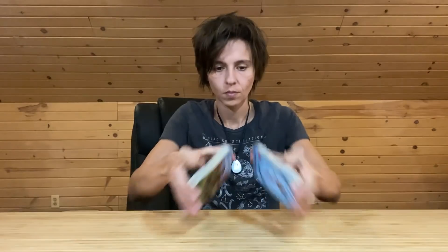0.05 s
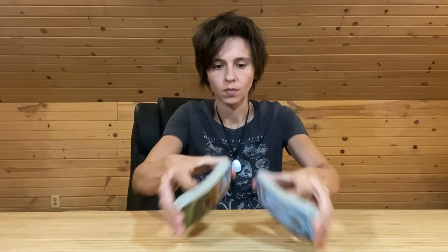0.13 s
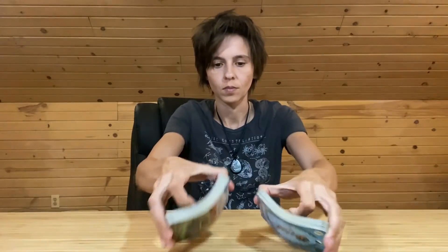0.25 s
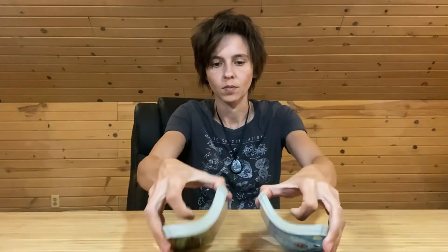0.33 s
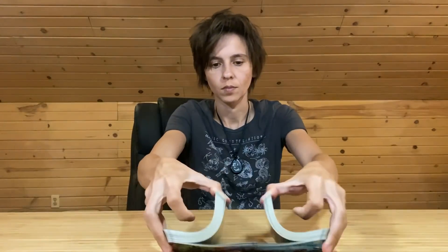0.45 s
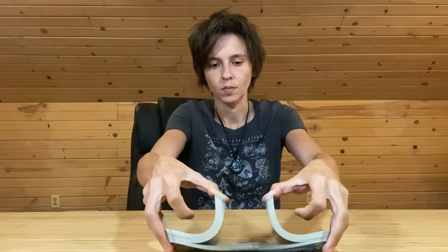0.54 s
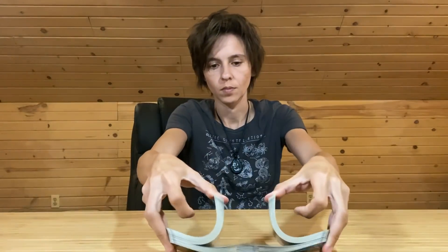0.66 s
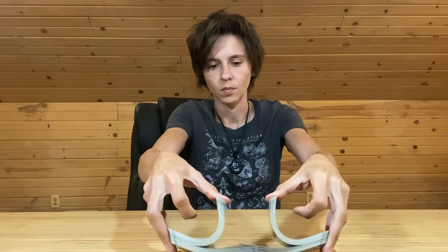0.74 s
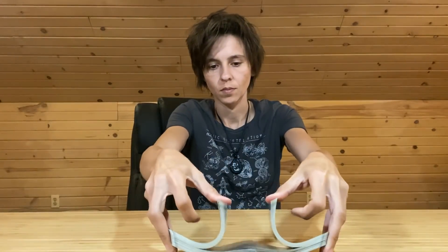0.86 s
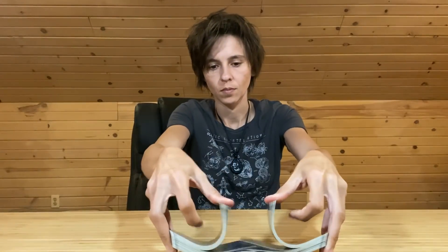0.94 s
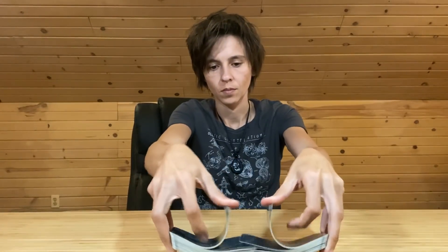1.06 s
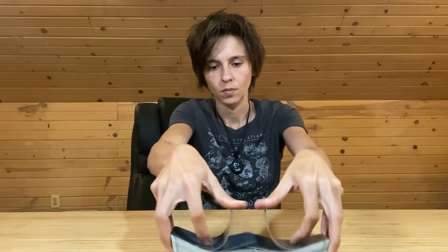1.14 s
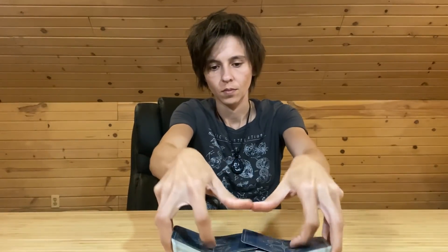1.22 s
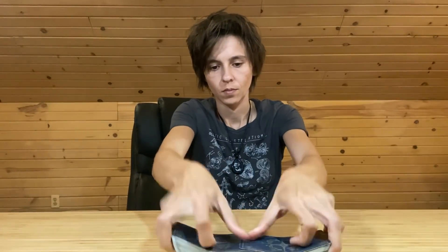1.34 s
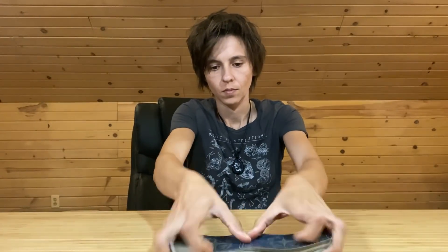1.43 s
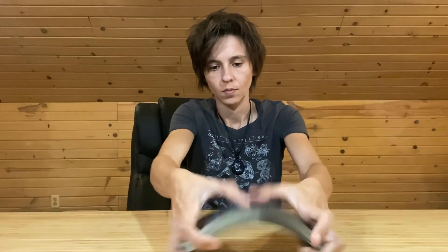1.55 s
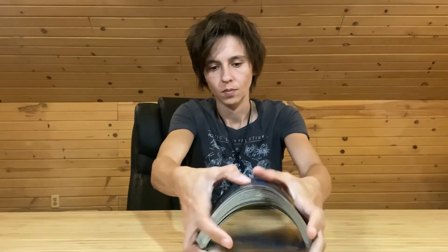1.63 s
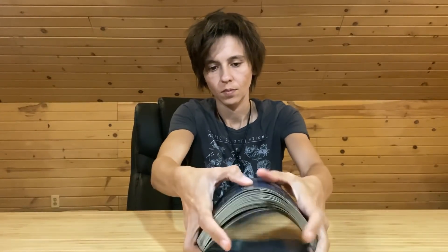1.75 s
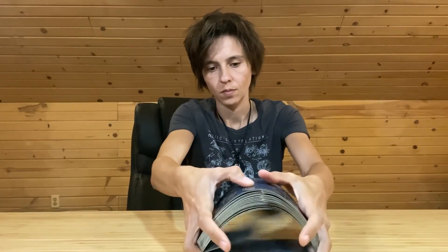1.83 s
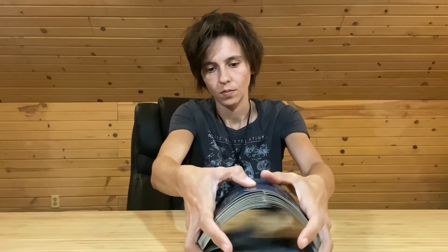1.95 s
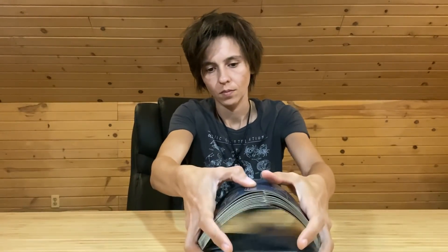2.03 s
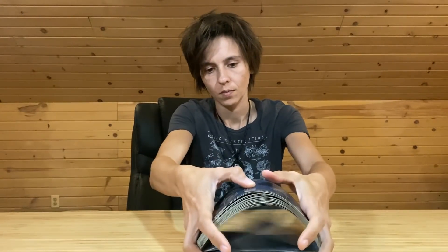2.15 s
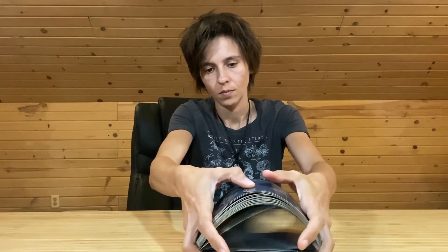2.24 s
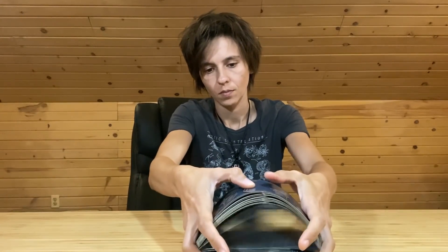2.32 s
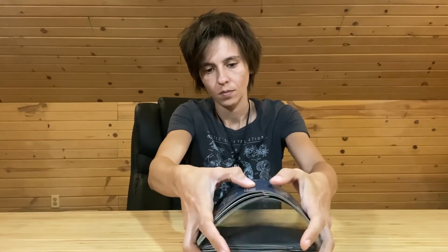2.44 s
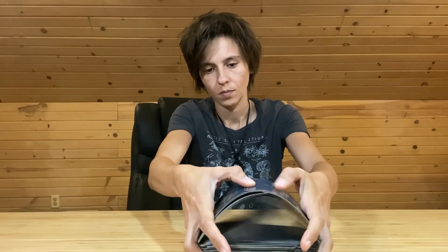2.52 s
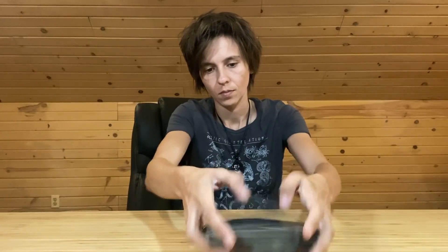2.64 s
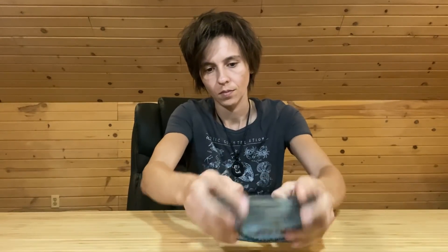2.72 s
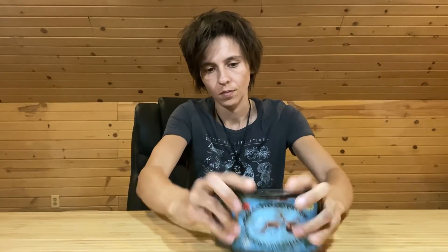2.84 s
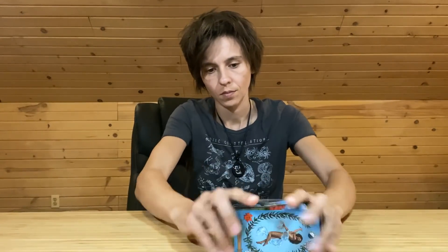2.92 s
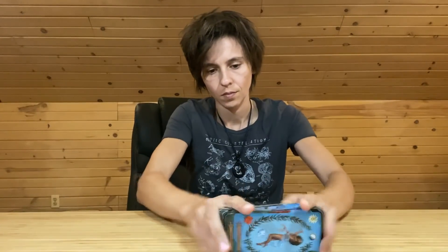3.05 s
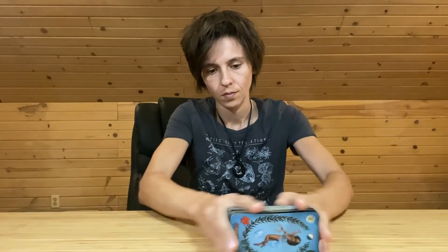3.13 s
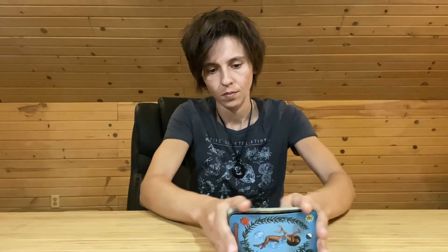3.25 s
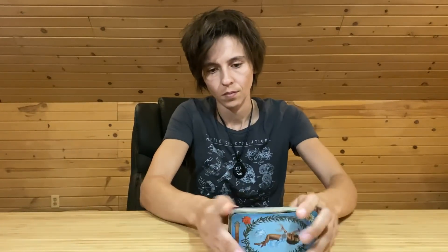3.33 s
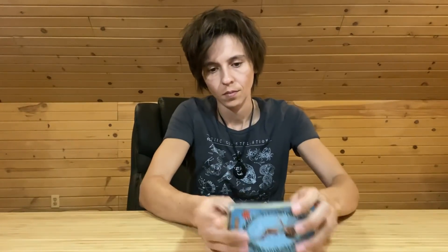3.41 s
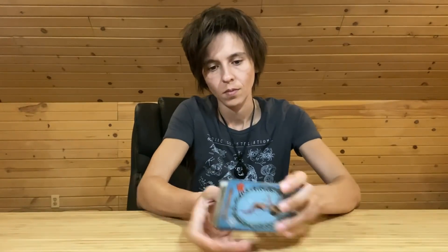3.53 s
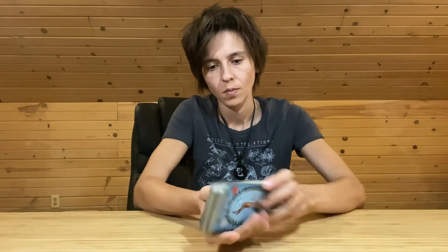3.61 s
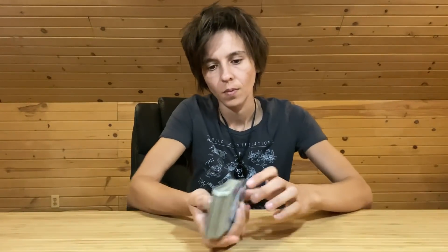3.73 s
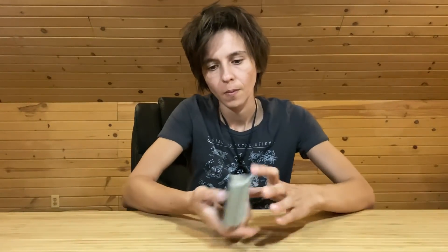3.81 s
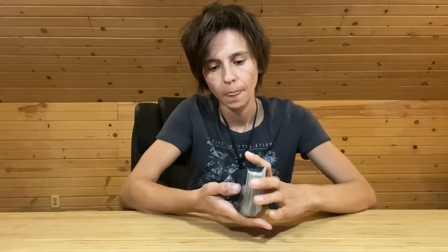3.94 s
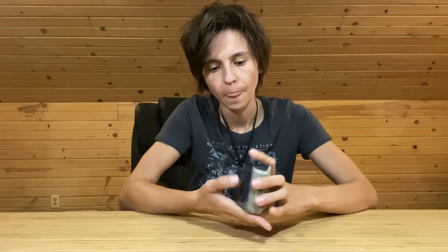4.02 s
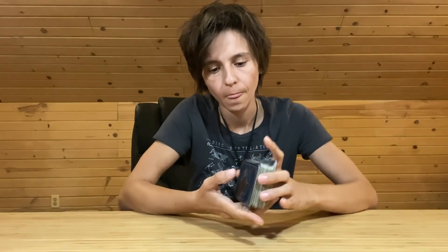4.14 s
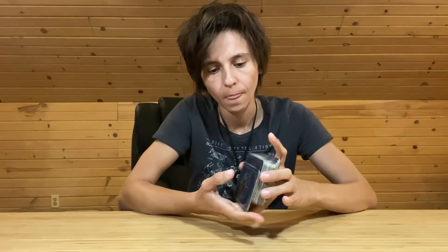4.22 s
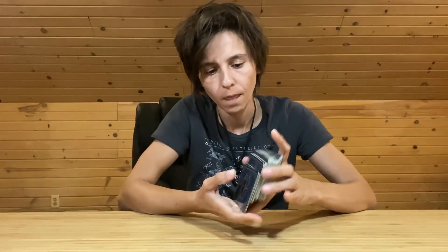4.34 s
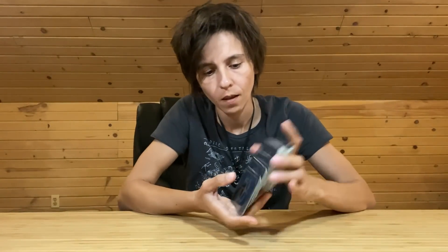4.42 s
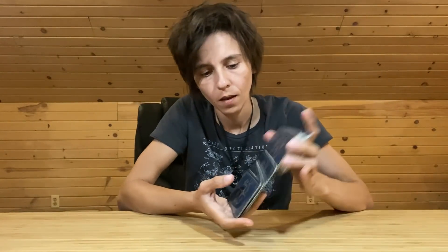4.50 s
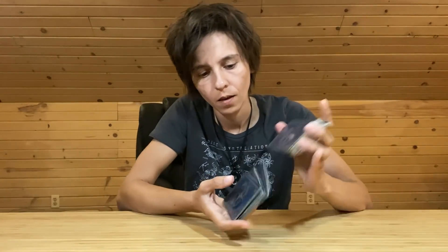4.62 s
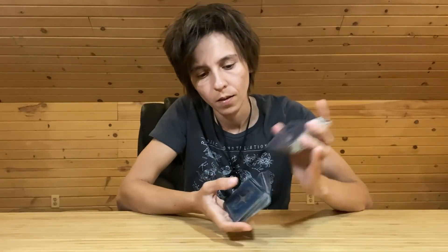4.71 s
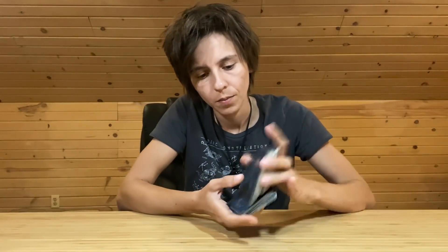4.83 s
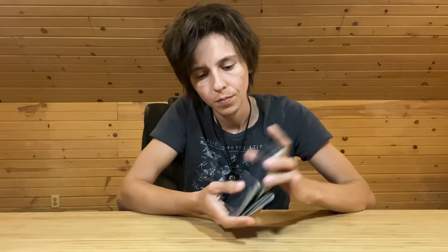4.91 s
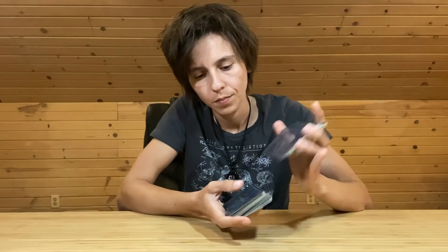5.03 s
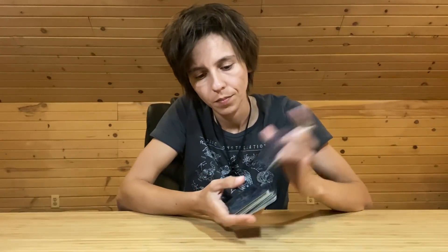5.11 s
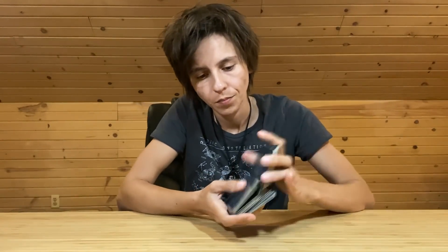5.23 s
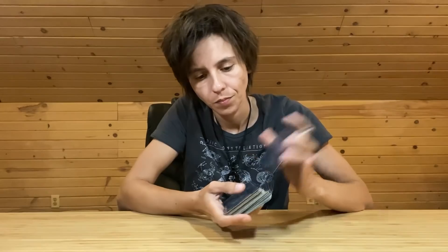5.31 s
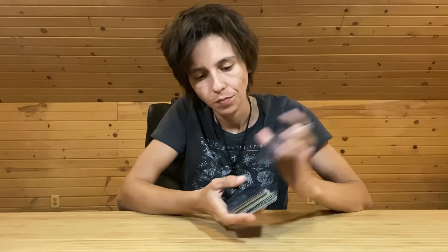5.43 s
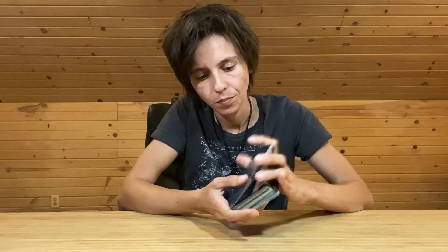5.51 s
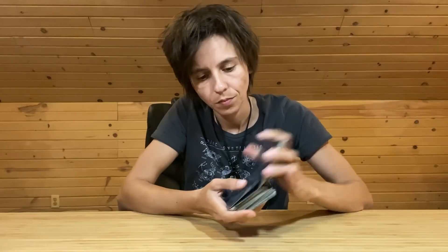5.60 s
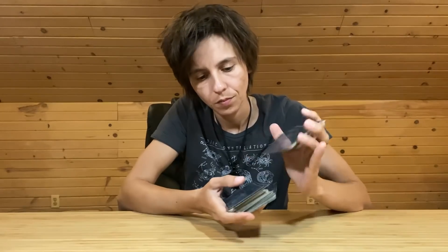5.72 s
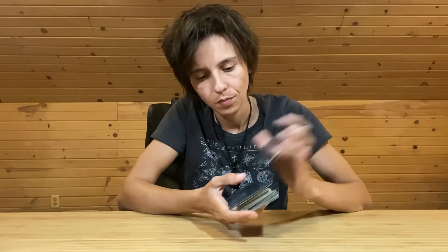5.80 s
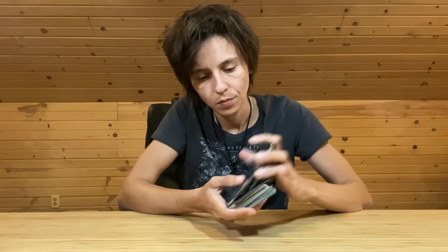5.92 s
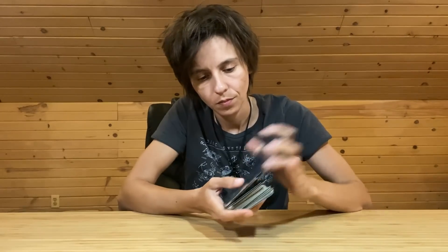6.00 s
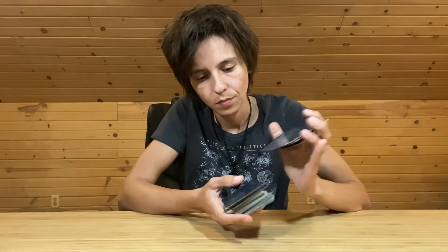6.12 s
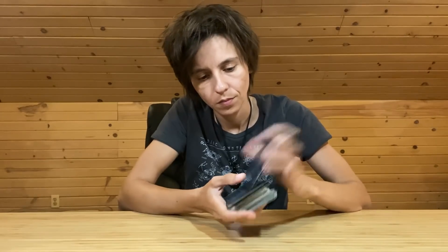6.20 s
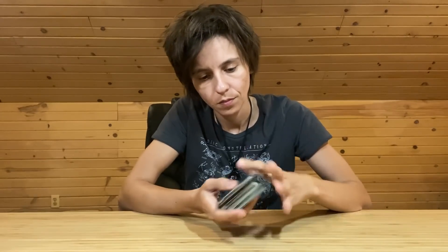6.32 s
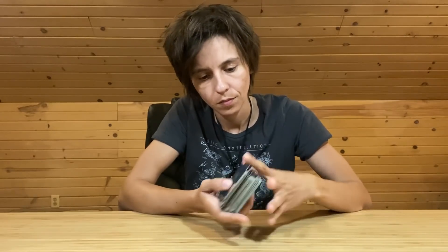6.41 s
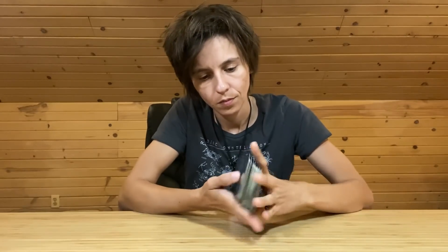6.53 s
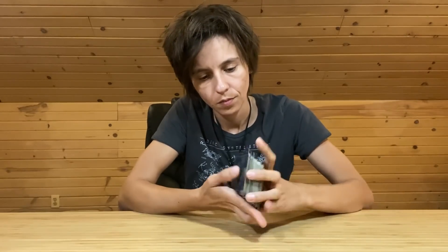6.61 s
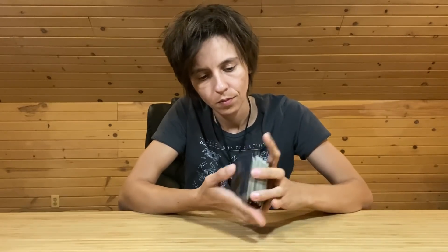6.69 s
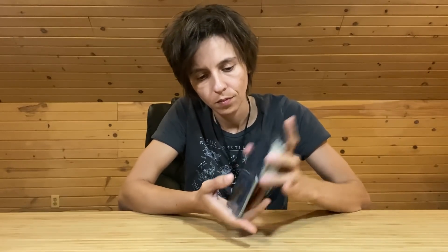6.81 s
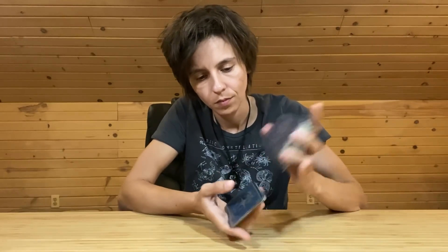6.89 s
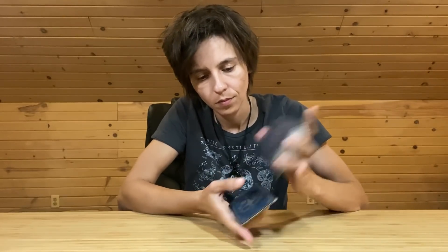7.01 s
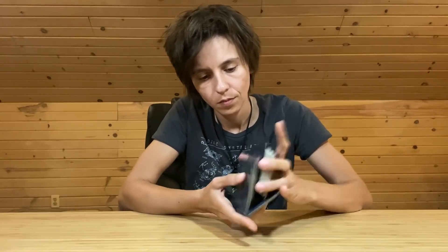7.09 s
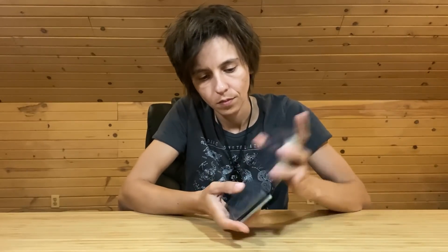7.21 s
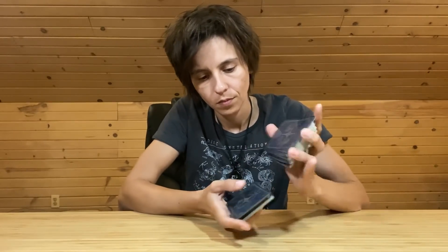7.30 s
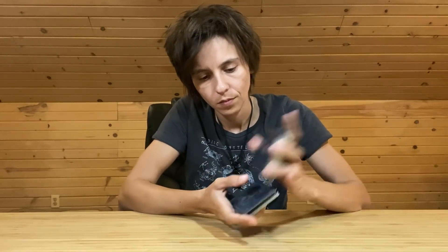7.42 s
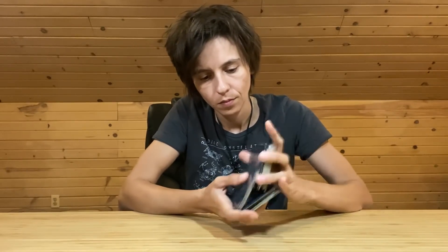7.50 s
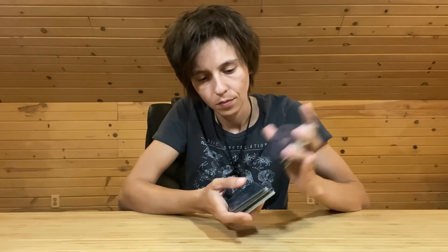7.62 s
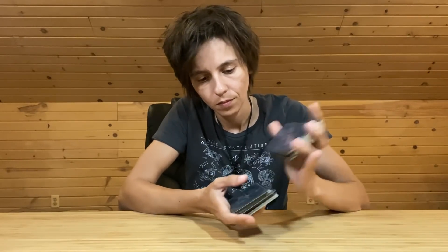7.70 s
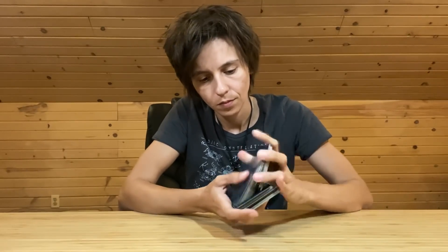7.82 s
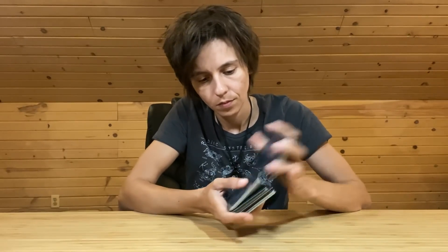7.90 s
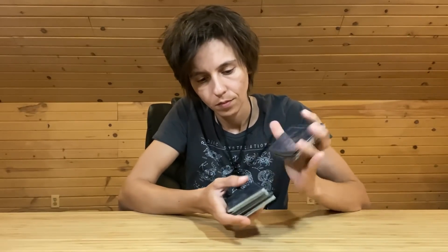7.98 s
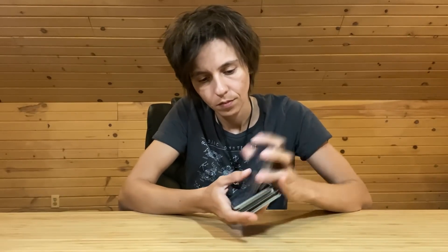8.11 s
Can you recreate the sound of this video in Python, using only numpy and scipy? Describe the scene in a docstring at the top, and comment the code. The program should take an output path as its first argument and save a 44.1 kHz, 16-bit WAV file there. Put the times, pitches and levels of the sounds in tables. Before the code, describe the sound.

Playing cards are shuffled at a wooden table, heard close in stereo with a short, dense wooden echo. First a bump and a strong rattling riffle over about a second, with a hard clack near its end; then a soft, uneven rush of bent cards springing together. The deck's edge knocks twice, roughly and woodily, with scraping. A near pause of faint brushing leads to eight loosely spaced packet slaps, some hollow, with dull palm thumps.

```python
"""Over a quiet room's rumble a deck of cards is rubbed and bumped on a wooden table, then riffled: bursts of
noise through card colours, drumming on the table's modes. One clack of the deck's edge falls in the riffle.
The arched halves slide together as fluttering friction with small snaps, and the edge is knocked square
twice in rough ringing clacks, with scrapes around it. Then come eight overhand strokes: packets touch, slap,
clap and slide home while palms and forearms thump the table. A short, dense wooden echo answers."""
import sys
import numpy as np
from scipy import signal
from scipy.fft import rfft, irfft
from scipy.io import wavfile

SR = 44100
rng = np.random.default_rng(int(sys.argv[2]) if len(sys.argv) > 2 else 0)


def wrap_up_sound(samples):
    """Save the sound to the file named by the first command line argument, as 16-bit audio."""
    columns = np.atleast_2d(samples).T
    # keep every value between -1 and 1, then stretch to whole-number steps
    tamed = np.clip(columns, -1, 1)
    steps = np.round(tamed * 32767).astype(np.int16)
    wavfile.write(sys.argv[1], SR, steps)


N = 359415
TIME = np.arange(N) / SR

# Levels in the tables are relative: each layer sets its own gain.
# Cards whipping off the thumbs: (time [s], body level [dB], crisp edge level [dB], left minus right [dB])
CARD_SNAPS = [(0.413, -5.5, -31.5, -6), (.426, -3.5, -23, -4.5), (0.446, -3, -22, 10),
              (.463, -12.5, -20, -1), (.483, -11.5, -20.5, 0), (.511, -12.5, -18, -1),
              (0.543, -10.5, -21.5, 10), (.561, 6, -11.5, -0.5), (.618, -7.5, -15, -1.5),
              (.647, -8, -12.5, 1.5), (.724, -5.5, -10.5, 0), (0.753, -5, -19, 0.5), (.789, -9.5, -9.5, 0),
              (.813, -10, -18, 10), (.849, -5, -14.5, 1.5), (.876, -9.5, -19, -6), (.893, -3, -13.5, 5.5),
              (.915, -6.5, -15, -1.5), (.924, -1, -9.5, 3), (.969, 0.5, -13.5, 0), (1.014, -2, -25.5, 0),
              (1.046, 0.5, -22, 4), (1.065, -13, -14, 1), (1.074, -7.5, -20, 2), (1.111, 0, -17, 0),
              (1.121, -10.5, -13, 2), (1.2, -4, -19.5, 0.5), (1.216, -6, -29, 0.5),
              (1.233, -6, -13.5, -0.5), (1.287, -10.5, -18.5, -0.5)]
# Stream of falling cards: (time [s], level [dB])
FALLING_CARDS = [(.415, -28.5), (.53, -30), (.58, -24), (.88, -33.5), (1.02, -23), (1.23, -26.5),
                 (1.34, -50)]
# Overhand strokes, a packet each: (slap time [s], slap level [dB], first touch before it [s],
# last cards settle after it [s], settling level [dB], sliding level [dB], hollow clap level [dB],
# clap pitch [Hz], palm thump level [dB])
PACKET_STROKES = [(4.897, -27, 0.014, 0.055, -38.5, -42.5, -35, 2390, -38),
                  (5.26, -23, 0.023, 0.083, -39.5, -43, -47, 1506, -30),
                  (5.591, -19, .012, 0.013, -38, -40.5, -9, 1547, -31.5),
                  (5.949, -23.5, 0.0047, .017, -20.5, -35, -12.5, 797, -30.5),
                  (6.288, -18.5, 0.0036, 0.067, -20, -34.5, -36, 950, -33),
                  (7.186, -19, 0.028, 0.041, -32, -40.5, -10.5, 2640, -29.5),
                  (7.53, -18, 0.025, 0.04, -45, -38, -7, 1270, -32.5),
                  (7.876, -24, 0.02, 0.011, -24, -44.5, -14, 1230, -34.5)]
# Resonances of the table top: (frequency [Hz], width [Hz], level [dB])
TABLE_MODES = [(62, 24, -8.5), (87.6, 25, -1), (129.9, 36, -3.5), (179.6, 14, 1.5), (215, 41, -6),
               (259.4, 12, -1), (286.7, 5.9, -6.5), (342.6, 18, -5), (393, 28, -4.5), (432, 73, -12)]
# Resonances of the squared deck on the table: (frequency [Hz], width [Hz], level [dB])
DECK_MODES = [(1024, 26, 7), (1177, 97, -4), (1700, 60, 4.5), (1870, 180, -6.5), (2200, 57, -9.5),
              (2537, 64, 1.5), (3150, 54, -8.5)]
# Colour of a packet of cards: (frequency [Hz], level [dB])
PACKET_COLOUR = [(150, 3), (400, -4.5), (650, -7), (1050, -6), (1550, -14), (2200, -13), (3300, -15),
                 (5000, -13), (7200, -7), (9500, -8), (13000, -10.5), (15500, -11.5)]
# Colour of the deck's edge on wood: (frequency [Hz], level [dB])
EDGE_COLOUR = [(40, -24.5), (150, -2), (380, 3.5), (700, -7), (1020, -2), (1420, -7), (1700, -8.5),
               (2700, -7.5), (3900, -18), (7000, -21), (16000, -37)]
# Colour of card rubbing on card: (frequency [Hz], level [dB])
RUB_COLOUR = [(250, -8.5), (500, -8), (1000, -7.5), (1500, -11), (2550, -6), (4000, -10.5), (6800, -11),
              (9700, -9), (12700, -13.5), (15000, -11.5)]
# Phase by which the right microphone leads: (frequency [Hz], phase [rad])
MIC_PHASE = [(3000, 0.2), (7000, -2.5), (15800, 6.5)]

SIDE_TOP_HZ = MIC_PHASE[1][0]  # stereo difference is rolled off above this
FIBRE_SCATTER_DB = 1.2  # unevenness of the catches in rubs and scrapes


def undb(db):
    """Decibels to gain."""
    return 10 ** (np.asarray(db) / 20)


def unit(x):
    """Scale to rms 1."""
    return x / np.sqrt(np.mean(x ** 2))


def curve(table):
    """Gain along (time [s], level [dB]), down at -150 dB outside the table."""
    return undb(np.interp(TIME, *np.transpose(table), left=-150, right=-150))


def add(track, s, sound):
    """Mix a sound into a track at time s."""
    i = max(int(s * SR), 0)
    track[:, i:i + sound.shape[-1]] += sound[..., :N - i]


def cut(x, hz, kind="low", order=2):
    """Butterworth slope."""
    corner_hz = min(hz, SR / 2 - 1)
    return signal.sosfilt(signal.butter(order, corner_hz, kind, fs=SR, output="sos"), x)


def resonate(x, hz, quality):
    """One broad resonance."""
    return signal.lfilter(*signal.iirpeak(hz, quality, fs=SR), x)


def ring(x, response):
    """Send a sound through an impulse response scaled to unit energy."""
    response = np.atleast_2d(response) / np.sqrt(np.sum(response ** 2))
    return signal.fftconvolve(x, response, axes=-1)[:, :x.shape[-1]]


def noise(size, spread):
    """Noise at two microphones; spread weighs the side against the middle."""
    mid, side = rng.standard_normal((2, size))
    side = cut(side, SIDE_TOP_HZ)
    return np.array([mid + spread * side, mid - spread * side]) / np.sqrt(1 + spread ** 2)


def panned(db):
    """Left and right gains for a level difference."""
    return undb(np.array([[db], [-db]]) / 2)


def colour(points, size=4096):
    """Causal, minimum-phase impulse response with the given spectrum, by folding its cepstrum."""
    hz, db = np.transpose(points)
    bins_hz = np.arange(size // 2 + 1) * SR / size
    gain = undb(np.interp(np.log(bins_hz + 1), np.log(hz), db))
    cepstrum = irfft(np.log(gain))
    cepstrum[1:size // 2] *= 2
    cepstrum[size // 2 + 1:] = 0
    return irfft(np.exp(rfft(cepstrum)))


def modes(table):
    """Impulse response of damped resonances: the wider a mode, the faster it dies."""
    t = TIME[:SR // 2]
    response = np.zeros(len(t))
    for k, (hz, width, db) in enumerate(table):
        sign = (-1) ** k
        response += sign * undb(db) * width * np.exp(-np.pi * width * t) * np.sin(2 * np.pi * hz * t)
    return response


def room(x, wet_db):
    """Direct sound plus the wooden walls' short, dense echo; long waves reach both microphones alike."""
    t60_s, side_spread = 0.22, 0.97
    t = TIME[:SR // 2]
    mid, side = rng.standard_normal((2, len(t)))
    side = side_spread * cut(cut(side, 660, "high", order=1), SIDE_TOP_HZ)
    onset = np.clip((t - .004) / 0.0064, 0, 1)  # 4 ms of silence, then a quick build
    tail = np.array([mid + side, mid - side]) * undb(-60 * t / t60_s) * onset
    return x + undb(wet_db) * ring(x, cut(tail, 20000, order=1))


def contact(decay, spread, rise=0.00048, size=4096):
    """Force of one collision: a rush of tiny contacts, as noise, that dies away."""
    t = TIME[:size]
    shape = (1 - np.exp(-t / rise)) * np.exp(-t / decay)
    force = noise(size, spread) * shape
    return force * np.sqrt(np.mean(shape ** 2) / np.mean(force ** 2)) / shape.max()


def flex(force, low_hz=1000, quality=4, gain_db=5):
    """Every card is bent differently and so has a brief resonance of its own, within two octaves."""
    return force + undb(gain_db) * resonate(force, low_hz * 4 ** rng.random(), quality)


def grains(rate, scatter_db, spread):
    """Random catches of paper fibres as noise grains; scatter makes a few of them stronger."""
    caught = rng.random(N) < rate / SR
    sizes = caught * undb(scatter_db * np.minimum(rng.exponential(size=N), 4))
    decay_s = .0006
    power = signal.lfilter([1], [1, -np.exp(-1 / (decay_s * SR))], sizes ** 2)
    return unit(noise(N, spread) * np.sqrt(power))


def flutter(rate, depth_db):
    """Uneven grip: a gain that wanders quickly."""
    steps = rng.standard_normal(N // 100)
    return unit(undb(depth_db * np.interp(TIME * rate, np.arange(len(steps)), steps)))


def uneven(start, end, rate):
    """Times of a loose rhythm: one event somewhere in each beat, 64 at most."""
    times = start + (np.arange(64) + rng.random(64)) / rate
    return times[times < end]


def stroke(sound, s, length, rise=0.25):
    """A stretch of friction under a pressure that builds over a share of its length and eases off."""
    part = sound[:, int(s * SR):int((s + length) * SR)]
    progress = np.linspace(0, 1, part.shape[1])
    pressure = np.interp(progress, [0, min(rise, .5), .5 + rise / 2, 1], [0.09, 1, 0.52, 0.075])
    return unit(part) * pressure


def rasp(friction, centre_hz, hiss_db=-11):
    """Friction about one pitch region, over the wide hiss of card on card."""
    band = unit(cut(cut(friction, centre_hz * 2.19, order=4), centre_hz / 3.0, "high"))
    hiss = unit(cut(ring(friction, colour(RUB_COLOUR)), centre_hz * 3))
    return band + undb(hiss_db) * hiss


def thud(wood, soft_hz):
    """A soft blow on the table top; the softer it is, the lower the modes it reaches."""
    sound = cut(cut(wood, soft_hz), soft_hz / 2, "high", order=3)
    return sound / np.abs(sound).max()


def card_sound(body, edge, points):
    """The card's face radiates the middle range, its edge the treble."""
    split_hz = 4500
    response = colour(points)
    face = ring(body, cut(response, split_hz, order=4))
    return face + ring(edge, cut(response, split_hz, "high", order=4))


def snaps(table, points, decay, spread, body_db, edge_db):
    """Each card scrapes briefly past its neighbour and then slaps down; rows without a side are central."""
    body, edge = np.zeros((2, 2, N))
    for s, low_db, high_db, *side_db in table:
        side = panned(np.clip(sum(side_db), -10, 10))
        for track, db in ((body, low_db + body_db), (edge, high_db + edge_db)):
            slap = flex(contact(decay * 2 ** (rng.random() - .5), spread, rise=0.00025))
            add(track, s, slap * undb(db) * side)
            scrape = contact(.002, spread, size=384)[:, ::-1]  # reversed, it swells into the slap
            add(track, s - scrape.shape[1] / SR, scrape * undb(db - 12))
    return card_sound(body, edge, points)


def clack(hz, decay=.003, rise=.0008, rough=.7):
    """A bunch of cards rings for a few cycles, roughened by noise at the same pitch."""
    t = TIME[:SR // 16]
    shape = (1 - np.exp(-(t / rise) ** 2)) * np.exp(-t / decay)
    grit = unit(cut(resonate(noise(len(t), 0.41), hz, 3.8), hz * 2, order=4))
    tone = np.sin(2 * np.pi * hz * t + .5 * rng.standard_normal((2, 1)))
    return (tone + rough * grit) * shape / shape.max()


def air():
    """Low steady rumble of the quiet room, as coloured noise."""
    # colour of the room: (frequency [Hz], level [dB])
    air_colour = [(20, -25.5), (60, 0.5), (120, -2), (270, -18), (500, -19), (1260, -32.5), (4000, -43.5),
                  (16000, -43.5)]
    return undb(-49) * ring(noise(N, 0.91), colour(air_colour))


def arms(lean_db=-3, bump_hz=100, width_hz=38, detuning=.12):
    """Leaning hands rumble; palms and rocking forearms thump the table in short damped low tones."""
    # weight of the hands on the table: (time [s], rumble level [dB])
    leaning = [(0, -43), (.4, -37.5), (1.1, -30.5), (1.4, -30.5), (2.3, -40), (2.9, -38.5), (3.2, -32),
               (3.7, -39.5), (4.1, -74)]
    # forearms rocking on the table around the strokes: (time [s], level [dB])
    rocking = [(4.68, -36.5), (5.16, -34.5), (5.41, -31), (5.54, -31), (7.715, -36.5)]
    palm_lag_s = 0.0195  # the palm takes the packet, then thumps
    bumps = [(s + palm_lag_s, palm_db) for s, *_, palm_db in PACKET_STROKES] + list(rocking)
    thumps, t = np.zeros((2, N)), TIME[:SR // 4]
    age = np.pi * width_hz * t
    swell = age * np.exp(1 - age)
    for s, db in bumps:
        hz = bump_hz * (1 + detuning * rng.standard_normal())
        add(thumps, s, undb(db) * swell * np.sin(2 * np.pi * hz * t))
    thumps = cut(cut(thumps, 39.0, "high"), 170)
    rumble = unit(cut(cut(noise(N, 0.11), 160, order=3), 55, "high", order=4))
    return room(thumps, wet_db=3) + undb(lean_db) * rumble * curve(leaning)


def rubs(gain_db=-10):
    """Fingers and cards brush over the deck: short strokes of fibre noise, each in its own pitch region."""
    # brushing strokes: (time [s], length [s], level [dB], centre [Hz])
    brushes = [(0.25, 0.2, -50.5, 2140), (1.364, 0.48, -44, 3470), (2.937, 0.14, -24, 3330),
               (3.185, 0.88, -52, 8000), (3.62, 0.31, -42, 2240), (3.94, 0.075, -50, 1690),
               (4.467, 0.34, -55, 5990), (6.476, 0.56, -54.5, 6970), (7.049, 0.06, -57, 1990)]
    friction = grains(rate=4600, scatter_db=FIBRE_SCATTER_DB, spread=0.88)
    out = np.zeros((2, N))
    for s, length, db, centre_hz in brushes:
        add(out, s, undb(db + gain_db) * rasp(stroke(friction, s, length, rise=0.36), centre_hz))
    return room(out, wet_db=-6.5)


def knocks(thud_db=2.0, click_db=-3):
    """Hands and deck bump the table: its filtered modes thud, and a noise burst adds a dull click."""
    # bumps: (time [s], thud level [dB], softness as roll-off [Hz], click level [dB])
    bumps = [(.267, -27, 513, -20.5), (0.416, -19, 168, -38), (1.015, -16.5, 380, -37),
             (1.068, -14, 107, -43.5), (1.182, -9.5, 493, -7.5), (1.435, -23, 240, -22.5),
             (1.535, -15, 364, -21), (3.376, -14.5, 590, -21.5), (3.583, -22, 400, -38.5),
             (3.612, -20.5, 298, -33.5), (6.345, -26, 135, -26)]
    thuds, clicks = np.zeros((2, 2, N))
    wood = modes(TABLE_MODES)
    for s, db, soft_hz, tick_db in bumps:
        add(thuds, s, undb(db + thud_db) * thud(wood, soft_hz))
        add(clicks, s, undb(tick_db + click_db) * contact(decay=0.016, spread=0.2))
    clicks = ring(cut(clicks, 2700), colour(PACKET_COLOUR))
    return room(thuds, wet_db=1.0) + room(clicks, wet_db=-0.5)


def riffle(patter_db=-8.5, sizzle_db=-10):
    """Cards snap off the thumbs over the patter of lighter ones and a stream of fibre noise."""
    # colour of a bent card: (frequency [Hz], level [dB])
    bent_card = [(30, -3), (200, -0.5), (650, -6), (1000, 1), (1270, -2.5), (1420, -11.5), (1650, -3),
                 (2000, -10), (2250, -4), (3200, -6.5), (3700, -9.5), (7300, -9.5), (9500, -10.5),
                 (13000, -12), (15500, -12)]
    loud = snaps(CARD_SNAPS, bent_card, decay=0.0037, spread=0.64, body_db=-11.5, edge_db=4.0)
    light_rows = []
    for s in uneven(FALLING_CARDS[0][0], FALLING_CARDS[-1][0], rate=58):
        levels = np.interp(s, *np.transpose(FALLING_CARDS)) + 3 * rng.standard_normal(2)
        light_rows.append((s, *levels))
    light = snaps(light_rows, bent_card, decay=0.0017, spread=0.46, body_db=4.5, edge_db=5.5)
    stream = grains(rate=590, scatter_db=0.0, spread=0.62) * curve(FALLING_CARDS)
    patter = card_sound(stream * undb(patter_db), stream * undb(sizzle_db), bent_card)
    return room(loud + light + patter, wet_db=-3.5)


def drumming(stream_db=1, snap_db=-19, soft_hz=300, side_db=-3, lowest_hz=170):
    """The falling cards drum on the table, too light to move its lowest modes much; loud ones add thuds."""
    wood, thuds = modes(TABLE_MODES), np.zeros((2, N))
    for s, db, _, _ in CARD_SNAPS:
        add(thuds, s, undb(db + snap_db) * thud(wood, soft_hz))
    upper_wood = cut(cut(wood, lowest_hz, "high", order=3), 420, order=1)
    drum = ring(grains(rate=220, scatter_db=1.6, spread=0.4), upper_wood)
    drum = drum * curve(FALLING_CARDS) * undb(stream_db)
    # the hands sink onto the table, which then booms more
    boom_middle_s, boom_rise_s, boom_db = 0.82, 0.16, 4.5
    pressed = undb(boom_db * np.clip((TIME - boom_middle_s) / boom_rise_s + .5, 0, 1))
    return (drum + room(thuds, wet_db=-5.5)) * pressed * panned(side_db)


def squaring(ring_db=-13, crack_db=-11, dry_db=-6.0):
    """The deck drops on its edge in bunches; each clacks in its own pitch region and rings deck and wood."""
    # bunches striking the table: (time [s], level [dB], clack centre [Hz], left minus right [dB])
    bunches = [(1.1796, -1.5, 1120, 2.5), (2.9531, -3.5, 1100, 1), (2.9654, -7, 1200, -5.5),
               (2.969, 1.5, 1937, 8.5), (2.98, -8, 1870, 8), (3.01, -7, 2330, -1.5), (3.153, -14, 2700, -3),
               (3.1616, -5, 2567, -1), (3.1657, -1.5, 2190, -11.5), (3.170, -8.5, 2820, -1),
               (3.172, -4.5, 1780, -1.5), (3.1845, -1.5, 2385, 0.5), (3.189, -8, 1740, 0.5)]
    clacks, blows = np.zeros((2, 2, N))
    for s, db, centre_hz, pan_db in bunches:
        gain = undb(db) * panned(pan_db)
        add(clacks, s, clack(centre_hz) * gain)
        add(blows, s, contact(decay=0.0018, spread=0.39) * gain)
    woody = undb(ring_db) * ring(clacks, modes(DECK_MODES))
    crack = undb(dry_db) * clacks + undb(crack_db) * ring(blows, colour(EDGE_COLOUR))
    return room(woody, wet_db=-20.5) + room(crack, wet_db=-4)


def arch(body_db=-10, edge_db=0.0, spring_edge_db=-3, scatter_db=3):
    """The bent halves slide together with a fluttering hiss; single cards catch and spring free."""
    # halves sliding together: (time [s], friction level [dB])
    sliding = [(1.655, -50.5), (1.69, -36), (1.87, -31), (1.93, -37.5), (2.0, -34.5), (2.09, -40.5),
               (2.21, -37), (2.40, -36), (2.61, -27), (2.66, -39.5), (2.70, -32), (2.75, -33),
               (2.80, -53.5), (2.93, -58.5)]
    # cards springing free: (time [s], level [dB])
    springing = [(1.757, -15.5), (1.829, -14.5), (2.002, -12), (2.194, -17), (2.454, -16.5), (2.596, -16),
                 (2.6712, -9)]
    friction = grains(rate=2400, scatter_db=2.9, spread=.7)
    friction = friction * flutter(rate=35, depth_db=2.7) * curve(sliding)
    body = friction * flutter(rate=140, depth_db=4.5) * undb(body_db)
    hiss = card_sound(body, friction * undb(edge_db), RUB_COLOUR)
    ticks_per_s, tick_db = 56, 6  # small catches; level over the friction curve
    times = uneven(sliding[0][0], sliding[-1][0], ticks_per_s)
    levels = np.interp(times, *np.transpose(sliding)) + tick_db
    levels = levels + scatter_db * rng.standard_normal(len(times))
    rows = [(s, db, db + spring_edge_db) for s, db in list(springing) + list(zip(times, levels))]
    springs = snaps(rows, RUB_COLOUR, decay=.0015, spread=1.0, body_db=-10.0, edge_db=-1.5)
    return room(hiss + springs, wet_db=-2.5)


def scrapes(ring_db=-1, wood_db=-9, top_hz=2700):
    """The dragged edge catches and slips: fluttering grains ring the deck and the wood."""
    # drags of the deck's edge: (time [s], length [s], level [dB])
    drags = [(1.753, 0.045, -33), (2.927, 0.18, -31), (3.04, 0.13, -30.5), (3.132, 0.14, -22),
             (3.155, 0.13, -26), (3.293, 0.17, -28.5), (3.574, 0.38, -49.5), (6.774, 0.21, -55)]
    friction = grains(rate=1200, scatter_db=FIBRE_SCATTER_DB, spread=0.83)
    friction = friction * flutter(rate=48, depth_db=5.5)
    deck = undb(ring_db) * cut(ring(friction, modes(DECK_MODES)), 1150)
    wood = undb(wood_db) * ring(friction, colour(EDGE_COLOUR))
    sound, out = cut(deck + wood, top_hz, order=3), np.zeros((2, N))
    for s, length, db in drags:
        add(out, s, undb(db) * stroke(sound, s, length))
    return room(out, wet_db=-7.5)


def overhand(slip_db=-6, deck_db=-17, lowest_hz=260):
    """Each packet touches the pile, slaps with a hollow clap of squeezed air, slides home and settles."""
    touch_db, packet_edge_db = -34, -8.5  # first touch; edge relative to body
    tock_db, tock_hz = -36.5, 1060  # the pile answers each light touch with a small hollow note
    clap_decay_s, clap_quality = 0.0032, 1.86
    attack_s, hold_s, fall_db_per_s, slip_hz = 0.016, 0.011, 220, 2980  # sliding home
    contacts, t = [], TIME[:SR // 4]
    slips, claps = np.zeros((2, 2, N))
    friction = grains(rate=740, scatter_db=1.5, spread=0.96) * flutter(rate=73, depth_db=8.5)
    release = undb(-fall_db_per_s * np.maximum(t - attack_s - hold_s, 0))
    pressure = np.minimum(t / attack_s, 1) * release
    for s, slap_db, lead, lag, settle_db, slide_db, clap_db, clap_hz, _ in PACKET_STROKES:
        contacts += [(s - lead, touch_db), (s, slap_db), (s + lag, settle_db)]
        contacts += [(s + 0.092 * u, slap_db - 19.5) for u in rng.random(size=3)]  # stragglers
        slip = rasp(friction[:, int(s * SR):][:, :len(t)], slip_hz, hiss_db=2.5)
        add(slips, s - attack_s / 2, undb(slide_db + slip_db) * pressure * slip)
        hollow_notes = ((s - lead, tock_db, tock_hz), (s, clap_db, clap_hz), (s + lag, tock_db, tock_hz))
        for when, db, hz in hollow_notes:
            clap = resonate(contact(clap_decay_s, spread=0.33), hz, clap_quality)
            clap = resonate(clap, hz, clap_quality / 2)
            add(claps, when, undb(db) * clap / np.abs(clap).max() / 2)
    rows = [(s, db, db + packet_edge_db) for s, db in contacts]
    slaps = snaps(rows, PACKET_COLOUR, decay=0.0063, spread=0.5, body_db=-7.5, edge_db=-1.5)
    slaps = cut(slaps, lowest_hz, "high", order=1)
    deck = undb(deck_db) * ring(cut(slaps, 840), modes(DECK_MODES))
    return room(slaps, wet_db=1.5) + room(claps, wet_db=-5) + deck + room(slips, wet_db=-12.5)


def stray_cards():
    """Single stray cards click on the pile, each a short rough tone at its own pitch."""
    # stray touches: (time [s], level [dB], pitch [Hz])
    strays = [(4.988, -41, 1010), (7.651, -45.5, 1088)]
    out = np.zeros((2, N))
    for s, db, hz in strays:
        add(out, s, undb(db) * clack(hz))
    return room(out, wet_db=2.5)


def microphones(x):
    """The right microphone leads the left by a phase that varies with frequency, mostly in the treble."""
    bins_hz = np.arange(N + 1) * SR / (2 * N)
    phase = np.interp(bins_hz, *np.transpose(MIC_PHASE))
    return irfft(rfft(x, 2 * N) * np.exp(.5j * np.array([-phase, phase])))[:, :N]


def scene():
    """All the handling, in the quiet room."""
    table_work = air() + arms() + rubs() + knocks()
    riffling = riffle() + drumming() + squaring() + arch() + scrapes()
    return table_work + riffling + overhand() + stray_cards()


def record(dry):
    """Two microphones pick up the scene; peaks clip at full scale and the extreme top is cut."""
    clipped = np.clip(microphones(dry), -1, 1)
    return signal.sosfilt(signal.ellip(8, .2, 70, 15700, fs=SR, output="sos"), clipped)


dry = scene()
out = record(dry)
wrap_up_sound(out)
```